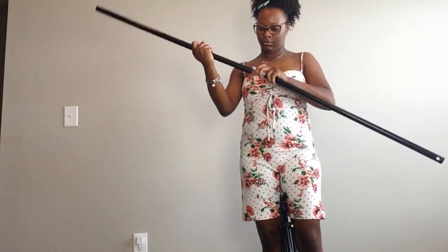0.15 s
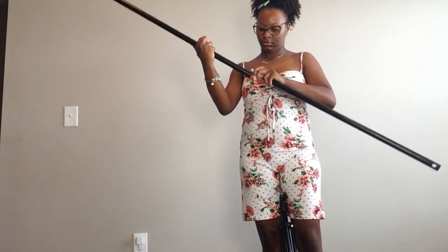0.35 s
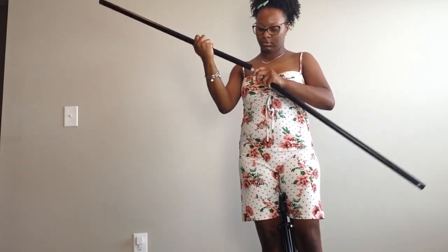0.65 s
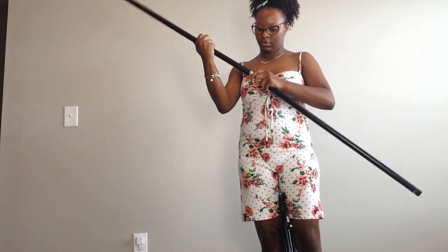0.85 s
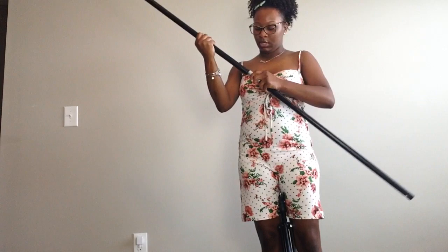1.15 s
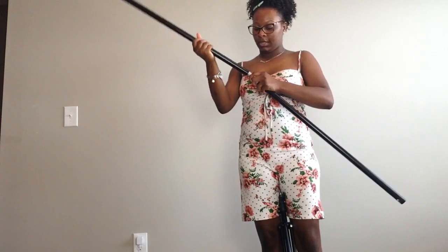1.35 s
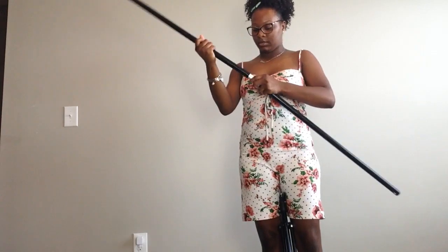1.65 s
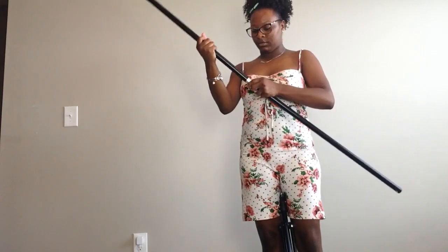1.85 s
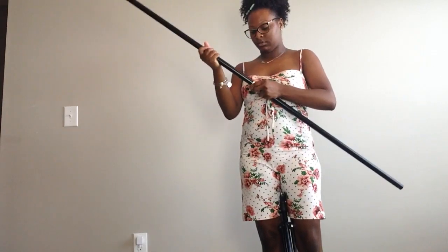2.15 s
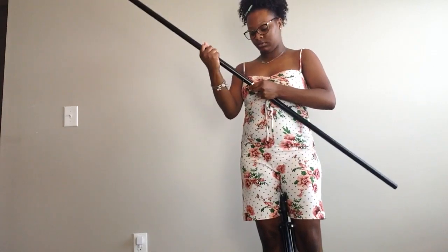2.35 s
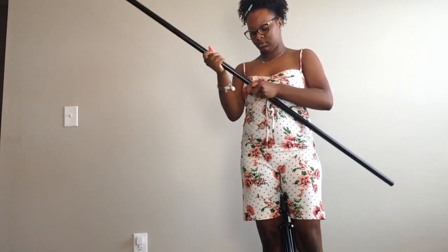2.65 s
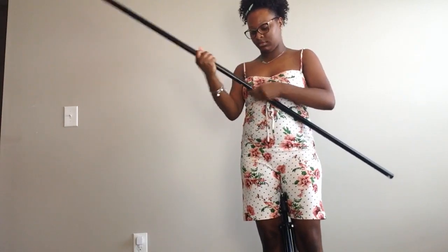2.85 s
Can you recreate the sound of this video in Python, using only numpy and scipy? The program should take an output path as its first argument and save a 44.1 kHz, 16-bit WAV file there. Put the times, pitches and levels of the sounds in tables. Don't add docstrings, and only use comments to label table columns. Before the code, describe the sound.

Metal tube sections faintly scrape and knock in the hands, then snap together hard and bright

```python
import sys
import numpy as np
from scipy import signal
from scipy.io import wavfile

SR = 44100
rng = np.random.default_rng(int(sys.argv[2]) if len(sys.argv) > 2 else 0)


def to_linear_factor(level_db):
    exponent = np.asarray(level_db, float) / 20
    return 10 ** exponent


def store_wav(level_fs):
    pcm = np.round(np.clip(np.atleast_2d(level_fs), -1, 1) * 32767)
    wavfile.write(sys.argv[1], SR, pcm.T.astype(np.int16))


N = 132300
T = np.arange(N) / SR

# start in seconds, level in dB, thud of the hands in dB,
# treble part in dB, ring of the thin wall in dB.
KNOCKS = [(.376, -38.5, 5, -0.5, 18), (.382, -41, -2.5, -19, 35), (0.6135, -44, 0.5, -15, 28),
          (.620, -50, -3, -8, 28), (0.734, -43, 11, -24, 33), (.798, -60, -14, 2, 26),
          (.9367, -38.5, 8, -19, 26), (0.9402, -34, 5, -20, 23), (.9450, -42.5, 8.5, -23, 20),
          (1.3698, -31, 2, 3, 36), (1.377, -33.5, 1, -15, 35), (2.151, -66, -9, 0, 26),
          (2.233, -50, -12, 9.5, 32), (2.5597, -12.5, -44, -3, 10), (2.5642, -13.5, -29, 2.8, 28),
          (2.573, -25, -30, 9.5, 25)]
# start in seconds, swell in seconds, fade in seconds,
# level in dB, treble part in dB.
SLIDES = [(.10, 0.054, 0.084, -60, 1.5), (.2, 0.049, 0.033, -59.5, 5.5), (.57, 0.023, 0.028, -66, -5),
          (0.681, 0.027, .03, -63, -19), (.905, 0.0086, 0.01, -63, 7), (1.357, 0.018, 0.0028, -45.5, 12),
          (1.58, 0.053, 0.15, -60.5, -10), (2.056, 0.053, 0.0094, -45.5, -4),
          (2.097, 0.02, 0.017, -42.5, -26), (2.24, 0.023, 0.18, -56.5, -4), (2.468, 0.078, .02, -38.5, -16),
          (2.909, 0.024, 0.094, -53.5, -0.5)]
MODE_HZ = [780, 890, 1140, 1378, 1437, 2190, 2250, 2486, 3340, 3440, 4420, 5550, 6850]
# peak gain in dB while loose, peak gain in dB once joined, T60 in seconds.
MODES = [(-1, -1, 0.071), (15.5, -7.5, 0.13), (15.5, -19, 0.18), (11.5, 21.5, 0.34), (23.5, 18.5, 0.14),
         (20.5, 17.5, 0.13), (21.5, 17, 0.2), (11.5, 11.5, 0.036), (-4.5, 3.5, 0.06), (17, 26.5, 0.08),
         (10, 15.5, 0.017), (7, 7, 0.026), (8.5, -11, 0.011)]
# frequency in Hz, T60 in seconds.
ROOM_DECAY = [(300, 0.18), (790, 0.68), (2090, 0.76), (5510, 0.74), (14600, 0.32)]
# delay in seconds, level in dB.
ECHOES = [(.0031, -9), (.0052, -8), (.0083, -10), (.0127, -11)]
# frequency in Hz, relative level in dB per Hz.
ROOM_TONE = [(30, -46), (70, -13.5), (250, 1.5), (450, -5), (700, -14.5), (2000, -15.5), (6000, -19.5),
             (15000, -21)]
# frequency in Hz, level in dB.
HUM = [(75.4, -85.5), (118.4, -72)]
# frequency in Hz, width in Hz, depth from 0 to 1.
MIC_DIPS = [(2950, 214, 0.46), (8150, 170, 1)]

SNAP_S, SHOVE_S = 2.55, 1.9
CHATTER_S, CHATTER_PER_S, FIRST_TOUCH_DB = 0.0041, 7600, 14.5
THUD_LOW_HZ, THUD_HIGH_HZ = 497, 1990
KNOCK_RING_DB, TURN_RING_DB, SHOVE_RING_DB, SLIDE_WALL_RING_DB = 15.5, -12.5, -23, 10.5
RUB_GRAINS_PER_S = 10000


def knocks():
    level, thud, high, touch, wall = np.full((5, N), 1e-9)
    chatter = grains(CHATTER_PER_S)
    for start, db, thud_db, high_db, wall_db in KNOCKS:
        since = np.clip(T - start, 0, None)
        shape = to_linear_factor(db) * (T >= start) * np.exp(-(since / CHATTER_S) ** 2)
        level = level + shape
        thud = thud + shape * to_linear_factor(thud_db)
        high = high + shape * to_linear_factor(high_db)
        i = int(np.ceil(start * SR))
        chatter[i] = to_linear_factor(FIRST_TOUCH_DB)
        touch[i] = to_linear_factor(db) * (level[i - 1] < to_linear_factor(db) / 2)
        wall[i] = to_linear_factor(db + wall_db)
    clicks = coloured(level * chatter, high / level)
    hands = cut(thud * rng.standard_normal(N), [THUD_LOW_HZ, THUD_HIGH_HZ], "band")
    bending = cut(tube(touch, KNOCK_RING_DB), THUD_LOW_HZ, "high")
    return clicks + hands + bending + wall_ring(wall)


def slides():
    level, high = np.full((2, N), 1e-9)
    for start, swell, fade, db, high_db in SLIDES:
        corners = [start, start + swell, start + swell + fade]
        shape = to_linear_factor(db) * np.interp(T, corners, [0, 1, 0]) ** 1.05
        level = level + shape
        high = high + shape * to_linear_factor(high_db)
    rub = coloured(level * grains(RUB_GRAINS_PER_S), high / level)
    ring_db = np.where(T < SHOVE_S, TURN_RING_DB, SHOVE_RING_DB)
    return rub + tube(rub, ring_db) + wall_ring(rub * to_linear_factor(SLIDE_WALL_RING_DB))


def tube(force, ring_db):
    out = 0
    for hz, (loose_db, joined_db, t60) in zip(MODE_HZ, MODES):
        grip_db = 2.0 * np.interp(T, np.linspace(0, 3, 25), rng.standard_normal(25))
        mode_db = np.where(T < SNAP_S, loose_db + grip_db, joined_db)
        out = out + ring(force * to_linear_factor(ring_db + mode_db), hz, t60)
    return out


def wall_ring(force):
    return ring(force, hz=9550, t60=0.051)


def ring(force, hz, t60):
    radius = to_linear_factor(-60 / (t60 * SR))
    w = 2 * np.pi * hz / SR
    drive = [0, 2 * (1 - radius) * np.sin(w)]
    return signal.lfilter(drive, [1, -2 * radius * np.cos(w), radius * radius], force + 1e-18)


def grains(per_s):
    size_db = 0.89 * np.minimum(rng.exponential(1, N), 4)
    sizes = to_linear_factor(size_db) * rng.choice([-1, 1], N)
    return rms_one(sizes * (rng.random(N) < per_s / SR))


def coloured(x, high_gain):
    treble = signal.lfilter(*signal.butter(1, 6500, "high", fs=SR), (high_gain - 1) * x)
    return cut(x + treble, 1115, "high")


def cut(x, hz, kind):
    return signal.sosfilt(signal.butter(2, hz, kind, fs=SR, output="sos"), x)


def rms_one(x):
    return x / np.sqrt(np.mean(x ** 2) + 1e-20)


def room(x):
    t = T[:SR]
    near = to_linear_factor(1.5 - 60 * t / 0.072)
    tail = 0
    for hz, noise in bands():
        tail = tail + noise[:SR] * (to_linear_factor(-60 * t / at_hz(ROOM_DECAY, hz)) + near)
    tail = tail * (1 - np.exp(-(t / 0.0027) ** 2))
    response = to_linear_factor(2) * tail / np.sqrt(np.sum(tail ** 2))
    response[0] = 1
    for delay, db in ECHOES:
        response[int(delay * SR)] -= to_linear_factor(db)
    return signal.fftconvolve(x, response)[:N]


def floor():
    knots = np.linspace(0, 3, 40)
    air = 0
    for hz, noise in bands():
        patchy_db = 1.0 * np.interp(T, knots, rng.standard_normal(len(knots)))
        air = air + noise * to_linear_factor(at_hz(ROOM_TONE, hz) + patchy_db)
    hum = sum(np.sqrt(2) * to_linear_factor(db) * np.sin(2 * np.pi * hz * T) for hz, db in HUM)
    return to_linear_factor(-62.5) * rms_one(air) + hum


def bands():
    edges = 25 * 2 ** np.arange(0, 9.6, .5)
    white = rng.standard_normal((2, N))
    out = []
    for k, (low, high) in enumerate(zip(edges, edges[1:])):
        out.append((np.sqrt(low * high), cut(white[k % 2], [low, high], "band")))
    return out


def at_hz(points, hz):
    table_hz, values = np.array(points).T
    return np.interp(np.log(hz), np.log(table_hz), values)


def scene():
    return (room(knocks() + slides()) + floor())[None]


def band_limit(x):
    return signal.sosfilt(signal.butter(12, 16270, fs=SR, output="sos"), x)


def record(dry):
    for hz, width_hz, depth in MIC_DIPS:
        dip = signal.lfilter(*signal.iirpeak(hz, hz / width_hz, SR), dry)
        dry = dry - depth * dip
    top_cut = signal.ellip(10, .3, 55, 15480, fs=SR, output="sos")
    return band_limit(signal.sosfilt(top_cut, dry))


dry = scene()
out = record(dry)
store_wav(out)
```